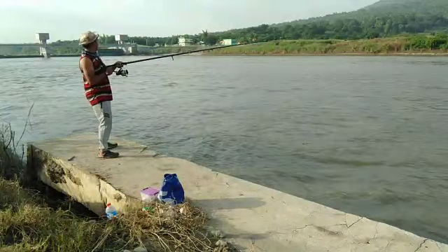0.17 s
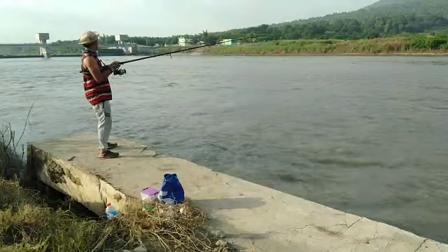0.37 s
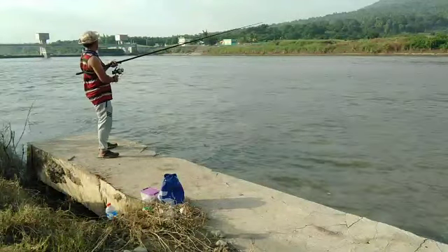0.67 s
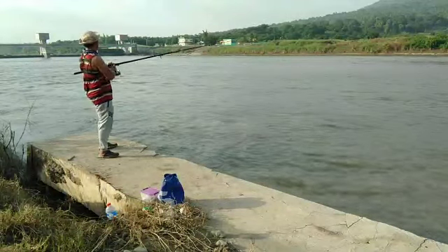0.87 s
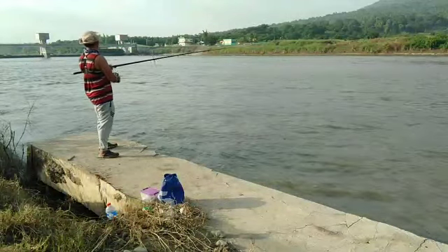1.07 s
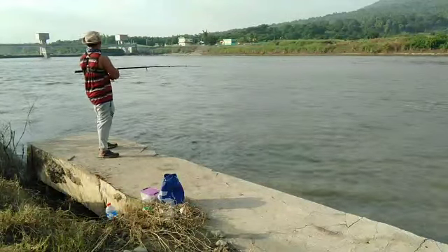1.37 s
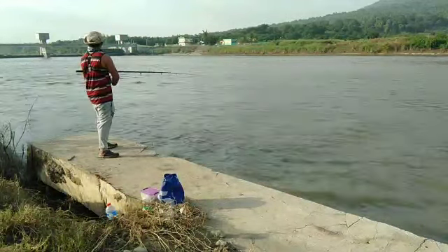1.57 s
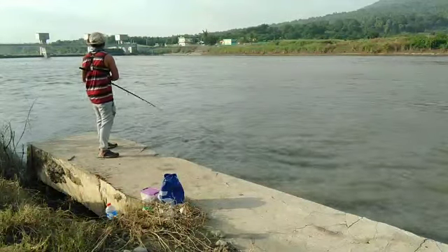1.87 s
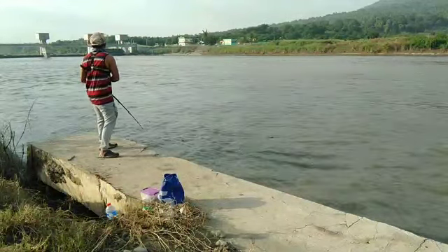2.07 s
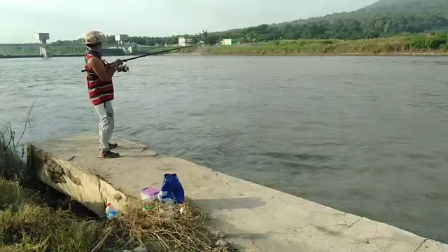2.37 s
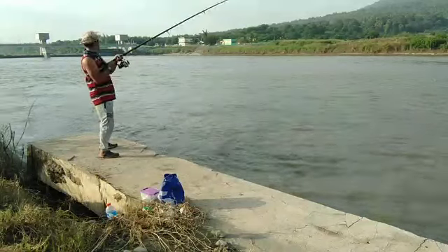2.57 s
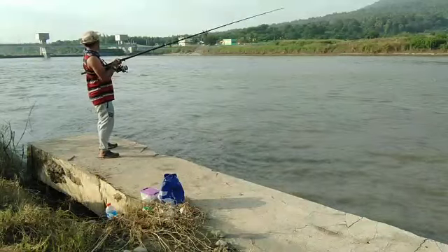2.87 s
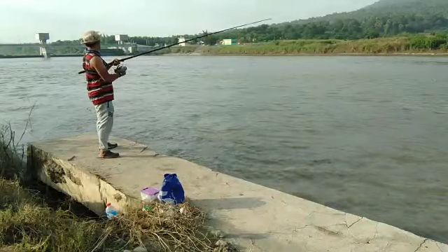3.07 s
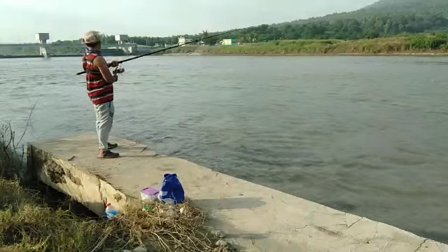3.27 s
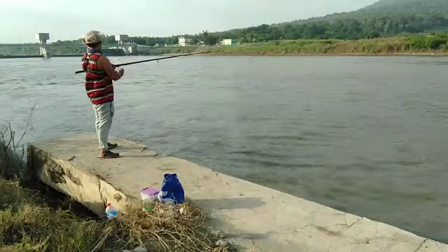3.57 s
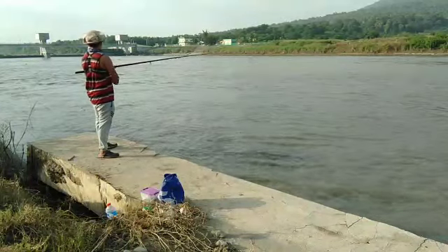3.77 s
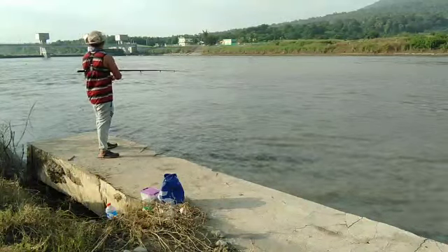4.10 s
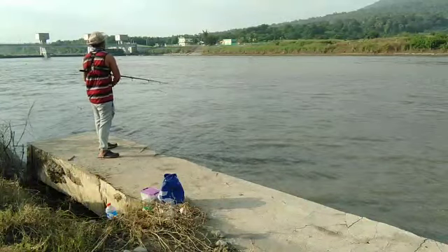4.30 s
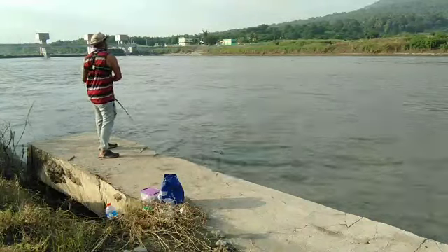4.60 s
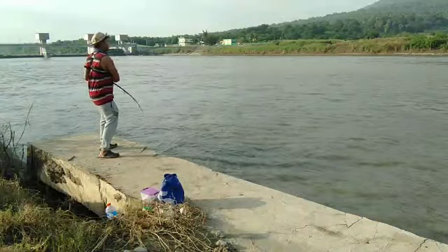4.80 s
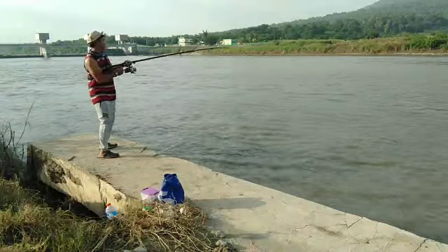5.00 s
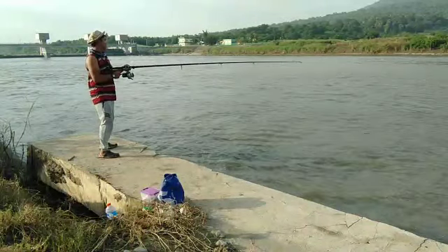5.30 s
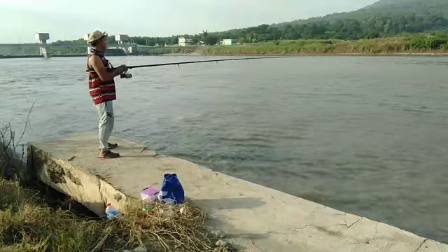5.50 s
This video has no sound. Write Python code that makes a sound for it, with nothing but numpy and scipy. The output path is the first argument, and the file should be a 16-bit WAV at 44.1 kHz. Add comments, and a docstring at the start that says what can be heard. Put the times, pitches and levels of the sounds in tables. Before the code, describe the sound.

Quiet outdoor water edge: a bright splash at once, then irregular lapping, hollow plops and fine drips, busiest near two seconds and again around four and a half. Soft rumbling gusts push directly on the microphone, with a few hard thumps. A rod whips faintly around two and a half seconds. Distant birds pip and chirp over a low steady hush, with a short thin scatter from the bank.

```python
"""Small waves lap at a concrete ramp close to the microphone: a splash of bubbles and filtered spray drains away,
then trapped air pockets gulp as gliding sines, drops tick as noise bursts and backwash trickles with each wave.
An angler whips his rod up once, near by, and it whistles in narrow bands of noise. Far off two small birds call,
one in thin pips, the other in runs of falling chirps. Concrete and bank scatter a short tail.
Gusts buffet the microphone and hum in its housing, over a steady low hush and a faint narrow band at 13 kHz."""
import sys
import numpy as np
from scipy import signal
from scipy.fft import rfft, irfft
from scipy.io import wavfile

SR = 44100
rng = np.random.default_rng(int(sys.argv[2]) if len(sys.argv) > 2 else 0)


def waveform_to_disk(signal):
    """Save audio, clipped to [-1, 1], as 16-bit WAV at the path in sys.argv[1]."""
    frames = np.transpose(np.atleast_2d(signal))
    scaled = np.clip(frames, -1, 1) * 32767
    samples = np.round(scaled).astype(np.int16)
    wavfile.write(sys.argv[1], SR, samples)


N = 249165
TIME, FREQS = np.arange(N) / SR, np.fft.rfftfreq(N, 1 / SR)  # s, Hz


def gain_of(db):
    """Decibels to amplitude."""
    return 10 ** (np.asarray(db) / 20)


def evened(x):
    """Scales to rms 1."""
    return x / np.sqrt(np.mean(x ** 2) + 1e-20)


def read(points, hz):
    """Reads a spectrum on a log-frequency axis."""
    f, value = np.transpose(points)
    return np.interp(np.log(hz + 1), np.log(f + 1), value)


def curves(rows):
    """The columns of a timed table, one value a sample."""
    s, *columns = np.transpose(rows)
    return [np.interp(TIME, s, c) for c in columns]


def add(mix, s, sound):
    """Mixes a sound in at time s."""
    part = mix[max(round(s * SR), 0):][:len(sound)]
    part += sound[:len(part)]


def coloured(x, spectrum):
    """Gives x a spectrum, at rms 1."""
    return evened(irfft(rfft(x) * gain_of(read(spectrum, FREQS)), N))


def band(hz, width):
    """Noise in one resonance, width Hz across at half amplitude, at rms 1."""
    resonance = 1 / (1 + (2 * (FREQS - hz) / width) ** 2)
    return evened(irfft(rfft(rng.standard_normal(N)) * resonance, N))


def steadied(x, span):
    """Noise whose strength holds even over times longer than span seconds."""
    window = signal.windows.hann(max(int(span * SR), 9))
    power = abs(signal.fftconvolve(x ** 2, window / window.sum(), "same"))
    return x / np.sqrt(power + 1e-6)


def wobble(per_s, depth_db):
    """An uneven gain that rises and falls about per_s times a second."""
    return gain_of(depth_db * np.tanh(band(per_s, per_s)))


def together(swells, calm_db):
    """Swells add in power over a calm level."""
    return np.sqrt(gain_of(calm_db) ** 2 + sum(s ** 2 for s in swells))


def bubble(hz, swell, rise):
    """An air pocket swells and dies, loudest after two swell times; its pitch glides by rise octaves a swell time."""
    u = np.arange(int(7 * swell * SR) + 2) / (2 * swell * SR)
    pitch = hz * 2 ** (rise * np.clip(2 * (u - 1), -2, 2))
    return (u * np.exp(1 - u)) ** 7 * np.sin(2 * np.pi * np.cumsum(pitch) / SR)


def fizz(per_s, spread_db, cycles, low_hz=700, high_hz=12000, count=36):
    """A crowd of tiny bubbles of many pitches and uneven sizes, each swelling for a number of its own cycles."""
    out = np.zeros(N)
    for hz in np.geomspace(low_hz, high_hz, count):
        strength = gain_of(spread_db * np.minimum(rng.exponential(1, N), 3.5))
        starts = strength * (rng.random(N) < per_s / count / SR)
        out += signal.oaconvolve(starts, bubble(hz, cycles / hz, 0.018))[:N] * np.sqrt(hz)
    return out


# The wavelet breaking on the ramp. Each row: time in seconds, level in dB before a lift of 1 dB,
# brightness as half the dB taken off below about 3200 Hz (negative adds there).
SPLASH_COURSE = [(0, -55.5, -1.5), (.03, -61.5, -2), (.06, -63.5, 2), (.09, -61, 0), (.12, -75, 10),
                 (.18, -77, 15), (.25, -85, 3), (.35, -100, -3)]
# Colour of spray and trickle. Each row: frequency in Hz, relative level in dB.
SPRAY_COLOUR = [(400, -31), (650, -26), (950, -14), (1150, -5), (1500, -6), (1850, -7.5), (2350, -4),
                (3000, -11), (4200, -7.5), (4800, -5.5), (7000, -4.5), (8300, -7.5), (10000, -12),
                (14000, -36)]


def splash(level_db=1, mist_db=-5):
    """A wavelet breaks into bubbles and a mist of spray whose balance of fine and coarse shifts as it drains."""
    level, bright = curves(SPLASH_COURSE)
    spray = evened(fizz(2600, 4.1, 5.55)) + gain_of(mist_db) * rng.standard_normal(N)
    spray = steadied(coloured(spray, SPRAY_COLOUR), 0.046)
    fine = signal.sosfiltfilt(signal.butter(2, 3200, "high", fs=SR, output="sos"), spray)
    coarse = spray - fine
    return gain_of(level + level_db) * (fine + gain_of(-2 * bright) * coarse)


# The loudest air pockets under the lapping edge. Each row: time of the loudest moment in seconds,
# peak in dB before the flutter, pitch there in Hz, swell time in seconds, rise in octaves per swell time.
AIR_POCKETS = [(.044, -53.5, 1477, .003, 0.014), (0.089, -55.5, 2300, .003, 0.067),
               (0.146, -60, 3745, .004, 0), (.162, -65.5, 645, .012, -0.0053), (0.214, -61, 295, .008, .04),
               (.254, -63.5, 330, .008, -0.061), (0.282, -65.5, 3600, .0055, .05),
               (.420, -74.5, 2270, .006, 0), (.598, -57, 259, .009, 0.03), (.602, -66, 636, .012, 0.08),
               (.674, -70.5, 2070, .007, -.03), (.695, -60, 275, .011, 0.003),
               (.734, -68.5, 1298, .005, 0.027), (0.984, -59.5, 317, .01, 0.21),
               (1.026, -61.5, 914, .008, -0.034), (1.115, -67, 644, .008, 0.033),
               (1.558, -55, 1637, .0025, .12), (1.560, -57.5, 2180, .004, -0.0023),
               (1.563, -54, 3070, .0015, 0.044), (1.703, -64.5, 1220, .006, .05),
               (1.750, -69, 1390, .007, .08), (1.772, -57, 608, .012, 0.26), (1.794, -51.5, 805, .006, .14),
               (1.803, -56.5, 1003, .004, -0.055), (1.813, -59, 3344, .003, 0.005),
               (1.827, -57, 287, .007, 0.077), (1.862, -64.5, 2770, .003, 0), (1.925, -73, 2430, .008, .03),
               (1.960, -60.5, 682, .008, 0.049), (2.060, -60.5, 674, .007, .11),
               (2.154, -67, 892, .005, 0.0093), (2.175, -54.5, 254, .008, 0.014),
               (2.277, -58.5, 288, .009, 0.02), (2.312, -56, 1590, .003, -0.032),
               (2.322, -59.5, 266.5, .01, 0.0038), (2.388, -57.5, 576, .009, 0.21),
               (2.422, -66.5, 1346, .004, -.03), (2.493, -63.5, 307, 0.0098, 0.049),
               (2.613, -68, 2166, .003, 0.059), (2.673, -65, 1786, .004, 0),
               (2.710, -53.5, 1130, .004, 0.13), (2.745, -63.5, 1170, .003, -0.065),
               (2.903, -63.5, 621, .014, 0.078), (2.982, -67, 2870, .004, 0.036),
               (3.313, -55.5, 802, .006, 0.094), (3.329, -61, 1260, .006, .24),
               (3.366, -64.5, 1060, .005, 0.054), (3.420, -56.5, 589, .007, 0.22),
               (3.429, -63, 729, .004, 0.16), (3.820, -66, 2700, .006, 0.02),
               (3.875, -70.5, 1665, .005, -.08), (3.881, -65, 2610, .002, 0.065),
               (3.931, -59, 3720, .002, 0.0058), (3.933, -67.5, 1890, .004, 0.12),
               (3.970, -65, 2840, .003, 0.057), (4.082, -71, 1604, 0.0057, .03),
               (4.164, -63.5, 396, .008, .04), (4.347, -54, 1336, .004, .07), (4.360, -63, 966, .005, 0),
               (4.476, -49, 593, .01, 0.24), (4.500, -54, 742, .003, -0.024),
               (4.519, -51, 1006, .006, 0.026), (4.535, -59, 1070, .003, 0.16),
               (4.575, -64, 973, .005, -0.055), (4.600, -63, 860, .007, 0.014),
               (4.621, -68.5, 1566, .005, -0.038), (4.680, -69, 1380, .006, 0),
               (5.272, -59.5, 970, .004, 0.045)]
# The loudest drops and slaps on the surface. Each row: approximate time in seconds, peak in dB,
# centre in Hz, half width in octaves, decay time constant in seconds.
SURFACE_DROPS = [(.027, -42.5, 7280, .19, 0.00096), (.045, -51, 6000, .65, 0.00045),
                 (.072, -46.5, 7600, .15, 0.0013), (.128, -52, 6300, .2, 0.0019),
                 (.173, -49.5, 6600, 0.2, 0.0018), (.194, -58, 7100, .14, .003),
                 (.756, -68, 6100, 0.13, .005), (.832, -66.5, 7460, .15, 0.0022),
                 (1.124, -67.5, 4330, .09, 0.0027), (1.490, -61, 7500, 0.14, 0.0027),
                 (1.491, -66, 4260, .14, 0.0026), (1.746, -62.5, 6900, 0.14, 0.019),
                 (1.777, -57.5, 9450, 0.18, 0.0018), (1.812, -52.5, 9640, 0.067, 0.002),
                 (1.812, -56.5, 3830, .15, 0.0031), (1.937, -62, 7100, .22, 0.011),
                 (1.960, -61, 6960, 0.087, 0.0042), (2.365, -64.5, 6800, .15, .005),
                 (2.614, -63, 7100, .38, 0.0032), (3.072, -63.5, 8200, 0.21, 0.0028),
                 (3.257, -66.5, 9900, .11, .002), (3.322, -65.5, 9370, .06, 0.0023),
                 (3.415, -67, 4150, 0.092, 0.0072), (3.804, -57.5, 6620, .07, .0015),
                 (3.864, -59, 5470, 0.096, 0.002), (3.942, -62, 4780, 0.16, .006),
                 (4.001, -67, 4770, .1, .0026), (4.025, -63.5, 4835, 0.074, .002),
                 (4.105, -64.5, 4960, .1, 0.0055), (4.142, -64, 6800, 0.41, 0.011),
                 (4.344, -62.5, 6400, 0.37, 0.0032), (4.432, -45, 8050, 0.14, 0.00069),
                 (4.515, -44.5, 6280, 0.24, 0.0009), (4.514, -49, 3000, 0.54, 0.00141),
                 (4.542, -47, 6050, 0.28, 0.0011), (4.556, -60, 5940, .2, .02),
                 (4.752, -71, 3830, 0.07, 0.0032), (5.582, -63, 3950, 0.072, 0.0044)]


def lapping(flutter=0.19):
    """Gulps of trapped air, unsteady in the moving water, and the short ticks of water hitting water."""
    out, t = np.zeros(N), np.arange(4096) / SR
    for s, db, hz, swell, rise in AIR_POCKETS:
        add(out, s - 2 * swell, gain_of(db) * bubble(hz, swell, rise))
    out *= 1 + flutter * band(110, 220)
    octave = np.log2(np.fft.rfftfreq(len(t), 1 / SR) + 1)
    lead = len(t) // 4  # room ahead of the burst for the filter to ring
    for s, db, hz, width, decay in SURFACE_DROPS:
        burst = rng.standard_normal(len(t)) * np.sqrt(t) * np.exp(-t / decay)
        resonance = 1 / (1 + ((octave - np.log2(hz)) / width) ** 4)
        tick = irfft(rfft(np.roll(burst, lead)) * resonance)
        add(out, s - t[lead] - decay, gain_of(db) * tick / abs(tick).max())
    return out


def cresting(db, length, crest):
    """A wavelet swells to its crest and ebbs as slowly."""
    return gain_of(db) * np.exp(-((TIME - crest) / length) ** 2)


STRAY_PER_S, STRAY_TOP_DB, STRAY_SPREAD_DB = 26, 8, 4.5  # top in dB over the trickle's swell, down to 9 dB less
STRAY_LOW_HZ, STRAY_HIGH_HZ = 1304, 2890


def strays(swell=.0045, rise=0.026):
    """Single small bubbles surface at random moments."""
    out = np.zeros(N)
    for k, (when, size, strength) in enumerate(rng.random((300, 3))):
        hz = STRAY_LOW_HZ * (STRAY_HIGH_HZ / STRAY_LOW_HZ) ** size
        db = STRAY_TOP_DB + STRAY_SPREAD_DB * (2 * strength - 2)
        add(out, (k + 2 * when) / STRAY_PER_S, gain_of(db) * bubble(hz, swell, rise))
    return out


# Colour of the slosh in the ramp's hollows. Each row: frequency in Hz, relative level in dB.
HOLLOW_COLOUR = [(150, -13.5), (260, 4), (340, -2), (450, -9), (600, -13.5), (900, -18), (2000, -63)]
# Wavelets along the ramp. Each row: time of the crest in seconds, half length in seconds,
# trickle in dB and slosh in dB, both before a cut of 1 dB, ring of the gap in dB.
WAVELETS = [(0.017, 0.069, -90, -92, -71), (0.205, 0.094, -86, -72.5, -75),
            (0.559, 0.097, -83, -70.5, -76.5), (.76, 0.12, -87, -74, -75), (1.162, .07, -90, -87, -77),
            (1.424, 0.051, -101, -95, -78.5), (1.795, 0.16, -81.5, -80, -74.5),
            (2.197, 0.061, -95, -73, -75.5), (2.35, 0.097, -86, -74.5, -76),
            (2.516, 0.056, -89, -70.5, -77.5), (2.668, 0.069, -83, -82, -92),
            (2.976, 0.13, -92, -86, -77.5), (3.351, 0.084, -83.5, -84, -74),
            (3.86, 0.077, -78.5, -81, -76.5), (4.106, 0.098, -79, -75.5, -78), (4.6, 0.24, -82, -79, -77.5),
            (5.306, 0.17, -99, -88, -84), (5.58, 0.069, -93, -84, -86.5)]
# Between wavelets; trickle and slosh before the same cut.
CALM_TRICKLE_DB, CALM_SLOSH_DB, CALM_GAP_DB = -88, -88.5, -91


def backwash(trickle_db=-1, slosh_db=-1, film_db=-6, gap_hz=660, gap_width=140):
    """With each wavelet water trickles off the concrete in a hissing film, sloshes in hollows and rings a gap."""
    trickle = evened(fizz(450, 5.0, 12.6)) + gain_of(film_db) * rng.standard_normal(N)
    trickle = steadied(coloured(trickle, SPRAY_COLOUR), 0.21)
    slosh = fizz(160, 3.1, 2.9, low_hz=221.7, high_hz=698, count=14)
    slosh = steadied(coloured(slosh, HOLLOW_COLOUR), .17) * wobble(per_s=9, depth_db=2.5)
    gap = steadied(band(gap_hz, gap_width), .15) * wobble(per_s=8, depth_db=3.5)
    flow = together((cresting(db, length, s) for s, length, db, _, _ in WAVELETS), CALM_TRICKLE_DB)
    # stray bubbles come only with the wavelets
    trickle = flow * trickle + (flow - gain_of(CALM_TRICKLE_DB)) * strays()
    slosh *= together((cresting(db, length, s) for s, length, _, db, _ in WAVELETS), CALM_SLOSH_DB)
    gap *= together((cresting(db, length, s) for s, length, _, _, db in WAVELETS), CALM_GAP_DB)
    return gain_of(trickle_db) * trickle + gain_of(slosh_db) * slosh + gap


# Tones shed by the swinging rod and line, higher where they are thinner. Each row: time of the loudest
# moment in seconds, rms there in dB, pitch in Hz, width in Hz, half length in seconds.
WHISTLE_TONES = [(2.418, -65.5, 1875, 59, .02), (2.462, -80.5, 2030, 150, 0.023),
                 (2.445, -60, 6840, 180, 0.021), (2.466, -71.5, 6440, 77, 0.015),
                 (2.470, -72, 3930, 260, 0.026), (2.515, -74, 4080, 110, 0.011),
                 (2.494, -74, 6700, 260, 0.02)]


def rod():
    """Each thickness of rod and line whistles while it moves fastest."""
    out = np.zeros(N)
    for s, db, hz, width, length in WHISTLE_TONES:
        swing = np.exp(-((TIME - s) / length) ** 2 / 2)
        out += gain_of(db) * swing * steadied(band(hz, width), 0.051)
    return out


def chirp(hz, fall, swell):
    """One short note, loudest after one swell time, falling by fall octaves over the next two."""
    u = np.linspace(0, 5, int(5 * swell * SR))
    pitch = hz * 2 ** (-fall * (np.minimum(u, 3) - 1) / 2)
    return (u * np.exp(1 - u)) ** 5 * np.sin(2 * np.pi * np.cumsum(pitch) / SR)


# The first bird's loudest pips. Each row: time of the loudest moment in seconds,
# peak in dB before the roughness, pitch in Hz.
LOUD_PIPS = [(.324, -65.5, 7700), (.752, -64.5, 7730), (1.154, -70.5, 8080), (1.217, -62, 7860),
             (1.359, -65, 7990), (1.444, -61.5, 7860), (1.460, -67, 7960), (1.557, -70.5, 8020),
             (1.65, -69.5, 7880), (1.762, -69, 8100), (1.976, -66, 7700), (2.502, -61.5, 7820),
             (2.669, -65.5, 7850), (2.913, -64.5, 7800), (3.474, -65.5, 7800), (3.694, -67, 7820),
             (3.891, -65.5, 7700), (4.321, -68, 7830), (4.656, -55.5, 7820), (5.016, -65.5, 7820)]
FAINT_PIP_GAP_S, FAINT_PIP_DB, FAINT_PIP_HZ = .27, -71, 7830  # it keeps calling softly in between
# The second bird's runs. Each row: time of the first chirp in seconds, peak of the last in dB
# before the roughness, number of chirps, fall in octaves.
CHIRP_RUNS = [(.975, -64.5, 2, 0.091), (1.213, -72, 2, 0.054), (1.412, -74.5, 3, 0.11),
              (1.651, -72.5, 3, 0.11), (1.889, -74, 3, .18), (2.125, -69, 3, 0.27), (2.748, -74.5, 3, 0.16),
              (2.939, -77, 3, .12), (3.128, -77, 3, .12), (3.347, -76, 3, 0.089), (3.564, -75.5, 3, .1),
              (4.142, -62, 2, .27), (4.375, -66, 2, 0.14), (4.613, -66.5, 2, .24), (4.816, -65, 3, 0.3)]
CHIRP_TOP_HZ, CHIRP_SAG = 5232, 0.31  # chirps start alike, so a deeper fall centres lower


def birds(pip_swell=0.0065, chirp_swell=0.0082, spacing=.033, growth_db=3, pip_spread=0.015, rough=0.29):
    """Far off, single high pips, and quick uneven runs that grow louder towards their last chirp."""
    out = np.zeros(N)
    for s, db, hz in LOUD_PIPS:
        add(out, s - pip_swell, gain_of(db) * chirp(hz, 0.0092, pip_swell))
    for k, (when, detune) in enumerate(rng.random((40, 2))):
        note = chirp(FAINT_PIP_HZ * (1 + pip_spread * (2 * detune - 1)), .01, pip_swell)
        add(out, (k + when) * FAINT_PIP_GAP_S, gain_of(FAINT_PIP_DB) * note)
    for s, last_db, count, fall in CHIRP_RUNS:
        hz = CHIRP_TOP_HZ * 2 ** (-CHIRP_SAG * fall)
        for k in range(round(count)):
            detune, stretch = rng.standard_normal(2)
            note = chirp(hz * (1 + .018 * detune), fall, chirp_swell * np.exp(0.16 * stretch))
            db = last_db - growth_db * (round(count) - 1 - k)
            add(out, s + k * spacing - chirp_swell, gain_of(db) * note)
    return out * (1 + rough * band(120, 240))


# Scatter from the shore. Each row: frequency in Hz, time to fall by 60 dB in seconds.
BANK_DECAY = [(200, 0.23), (1000, 0.25), (4000, 0.21), (9000, 0.24), (15000, 0.54)]


def shore(x, build=0.0094):
    """Concrete and bank scatter a short, thin tail that builds up softly."""
    taps = rng.standard_normal(SR) * (rng.random(SR) < 3000 / SR)
    taps *= np.minimum(np.arange(SR) / SR / build, 1) ** 2
    hz, t, z = signal.stft(taps, SR, nperseg=256)
    decay = gain_of(-60 * t / read(BANK_DECAY, hz)[:, None])
    tail = signal.istft(z * decay, SR, nperseg=256)[1]
    return signal.fftconvolve(x, tail / np.linalg.norm(tail))[:N]


GUST_RISE_S = .035


def gusting(db, decay, start):
    """A gust rises quickly and dies away."""
    age = np.maximum(TIME - start, 0)
    return gain_of(db) * np.minimum(age / GUST_RISE_S, 1) * np.exp(-np.maximum(age - GUST_RISE_S, 0) / decay)


# Colours of the push on the microphone and of the hum in its housing.
# Each row: frequency in Hz, relative level in dB.
BUFFET_COLOUR = [(20, -22.5), (35, -23.5), (50, -3.5), (75, -2), (105, 0.5), (140, -10.5), (220, -31.5),
                 (400, -66), (2000, -100)]
HOUSING_COLOUR = [(60, -25), (100, -9.5), (130, 3.5), (158, 1), (200, -15), (280, -30), (420, -41.5),
                  (900, -75), (3000, -100)]
# Gusts at the microphone. Each row: start in seconds, low buffeting in dB, hum of the housing in dB,
# decay time constant in seconds.
WIND_GUSTS = [(.32, -58, -50.5, 0.14), (.51, -62, -53.5, 0.1), (.75, -64.5, -58.5, 0.12),
              (.86, -70, -56.5, .08), (1.11, -47.5, -51.5, 0.16), (1.34, -55.5, -56.5, 0.054),
              (1.785, -53.5, -49, 0.26), (1.95, -63, -51.5, 0.17), (2.14, -47, -49.5, 0.23),
              (2.279, -54.5, -46.5, 0.4), (2.56, -58.5, -54, 0.36), (2.888, -48, -50, 0.17),
              (3.07, -55.5, -64, 0.065), (3.24, -53, -60.5, 0.1), (3.45, -64, -46.5, 0.26),
              (3.68, -54.5, -51.5, 0.11), (3.94, -52, -50, 0.41), (4.218, -53, -48.5, 0.26),
              (4.54, -49.5, -60, 0.14), (4.63, -59, -49.5, 0.23), (5.019, -49.5, -47, 0.24),
              (5.488, -57, -47, 0.094)]
BREEZE_BUFFET_DB, BREEZE_HUM_DB = -72.5, -66  # between gusts
# Single hard buffets. Each row: time of the middle in seconds, level of the swell's top in dB,
# pitch in Hz, half length in seconds.
HARD_BUFFETS = [(1.8086, -26, 106, 0.0052), (1.907, -36, 89.5, 0.013), (2.166, -32, 100, 0.0043),
                (4.185, -31, 93.2, 0.014)]


def wind():
    """Eddies push on the microphone and sound the hollows of its housing; a few land as thumps."""
    low = together((gusting(db, decay, s) for s, db, _, decay in WIND_GUSTS), BREEZE_BUFFET_DB)
    hum = together((gusting(db, decay, s) for s, _, db, decay in WIND_GUSTS), BREEZE_HUM_DB)
    out = low * steadied(coloured(rng.standard_normal(N), BUFFET_COLOUR), 0.14)
    out += hum * steadied(coloured(rng.standard_normal(N), HOUSING_COLOUR), 0.11)
    for s, db, hz, length in HARD_BUFFETS:
        swell = np.exp(-((TIME - s) / length) ** 2)
        out += gain_of(db) * swell * np.sin(2 * np.pi * hz * (TIME - s))
    return out


# Colour of the steady hush. Each row: frequency in Hz, relative level in dB per Hz.
HUSH_COLOUR = [(180, -18), (300, -1.5), (500, -6.5), (660, -4), (900, -10.5), (1500, -15), (3000, -19),
               (6000, -26.5), (7800, -17.5), (9000, -28.5), (12000, -28.5), (15000, -27)]
HUSH_DB = -80.5  # rms
NARROW_BAND_HZ, NARROW_BAND_WIDTH_HZ, NARROW_BAND_DB = 13000, 350, -100  # level is rms


def hush():
    """A steady low hush of coloured noise, plus a faint narrow band of noise at 13 kHz."""
    low_hush = gain_of(HUSH_DB) * coloured(rng.standard_normal(N), HUSH_COLOUR)
    return low_hush + gain_of(NARROW_BAND_DB) * band(NARROW_BAND_HZ, NARROW_BAND_WIDTH_HZ)


def scene(water_wet_db=-3.5, bird_wet_db=-5.0, backwash_wet_db=-2):
    """Waves and rod nearby, backwash and birds farther off, wind right on the microphone, a hush beneath."""
    near, along, far = lapping() + splash() + rod(), backwash(), birds()
    sent = gain_of(water_wet_db) * near + gain_of(backwash_wet_db) * along + gain_of(bird_wet_db) * far
    return (near + along + far + shore(sent) + wind() + hush())[None]


EDGE_HZ = 15550


def record(dry):
    """The recorder's band limit: a steep low-pass."""
    low_pass = signal.firwin(511, EDGE_HZ, window=("kaiser", 9), fs=SR)
    return signal.oaconvolve(dry, low_pass[None], "same")


dry = scene()
out = record(dry)
waveform_to_disk(out)
```